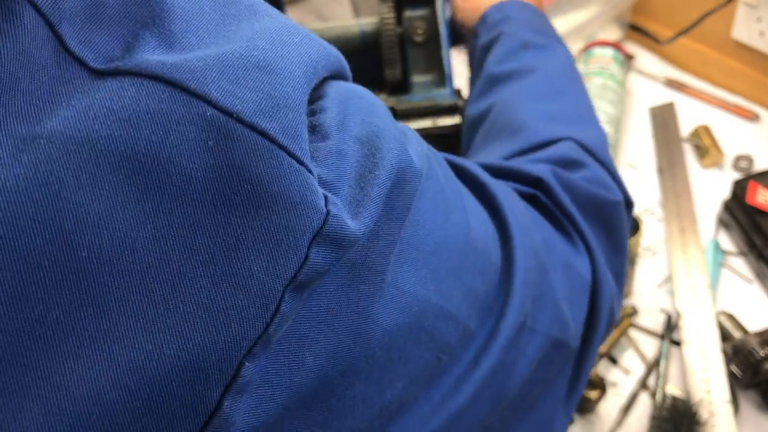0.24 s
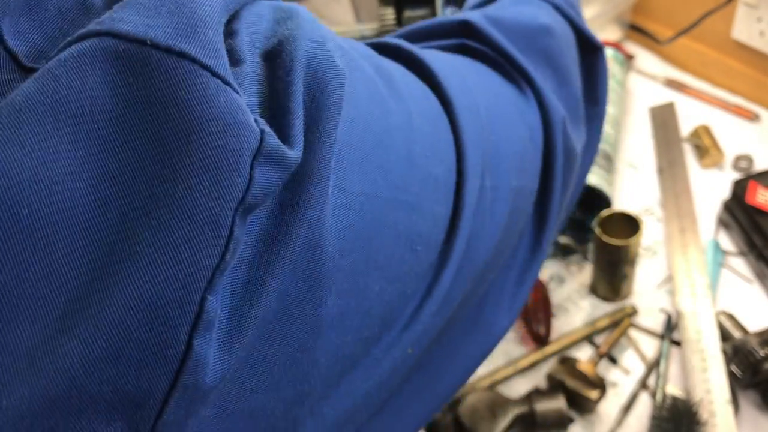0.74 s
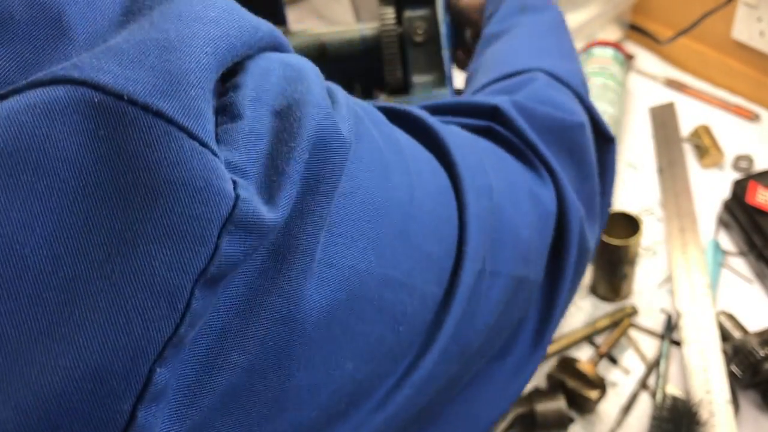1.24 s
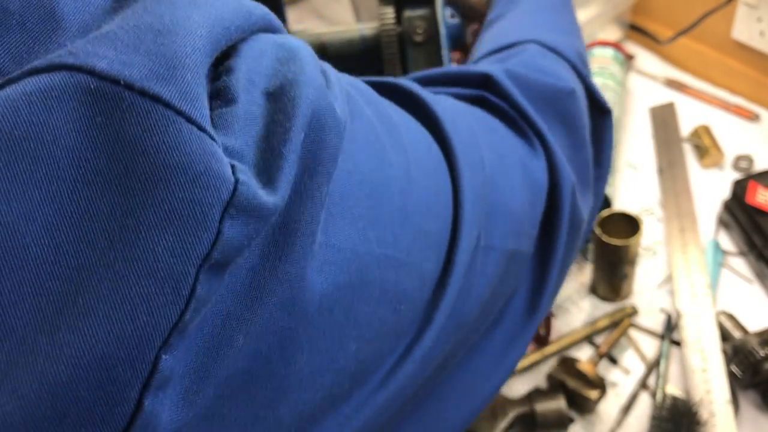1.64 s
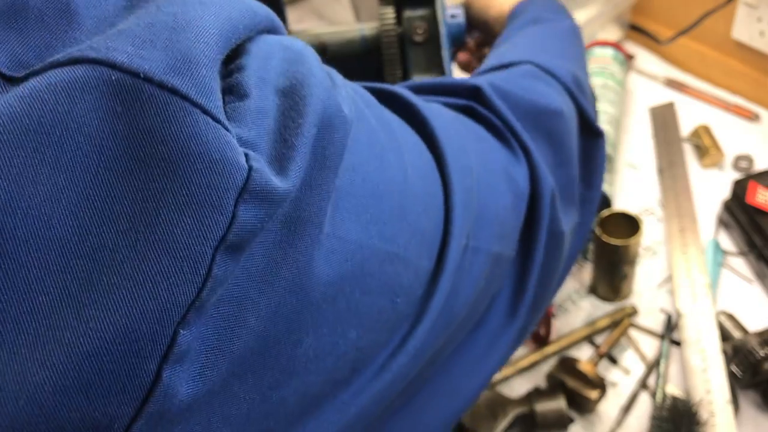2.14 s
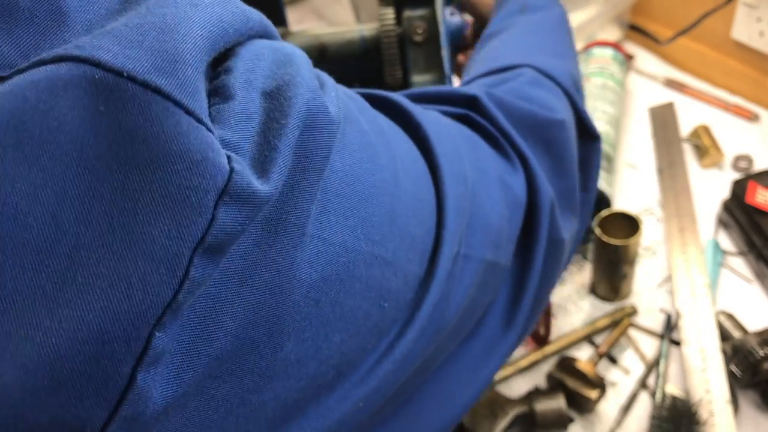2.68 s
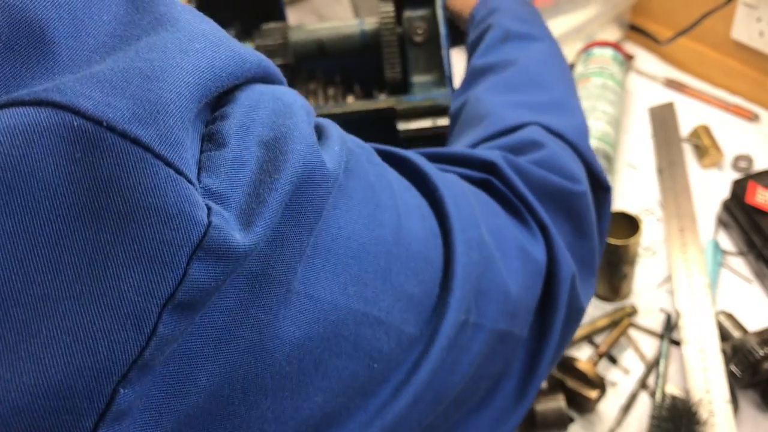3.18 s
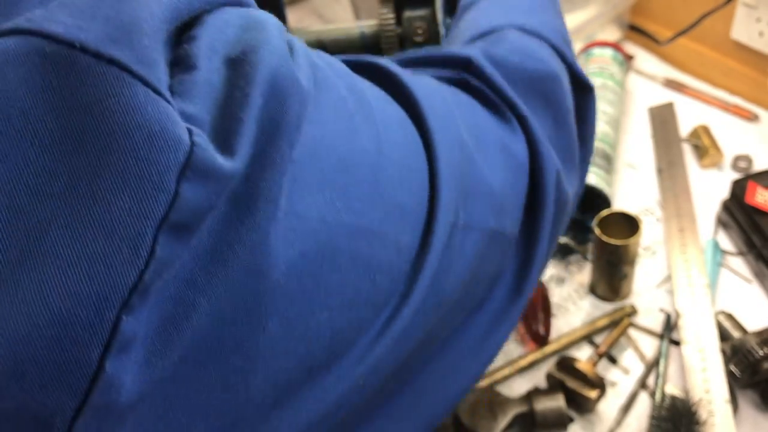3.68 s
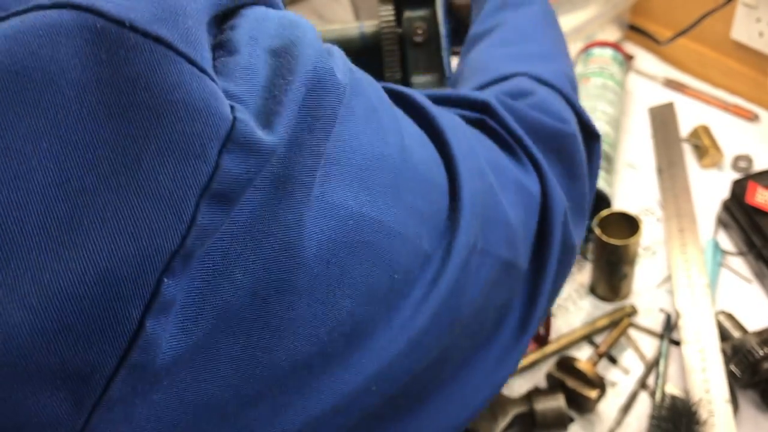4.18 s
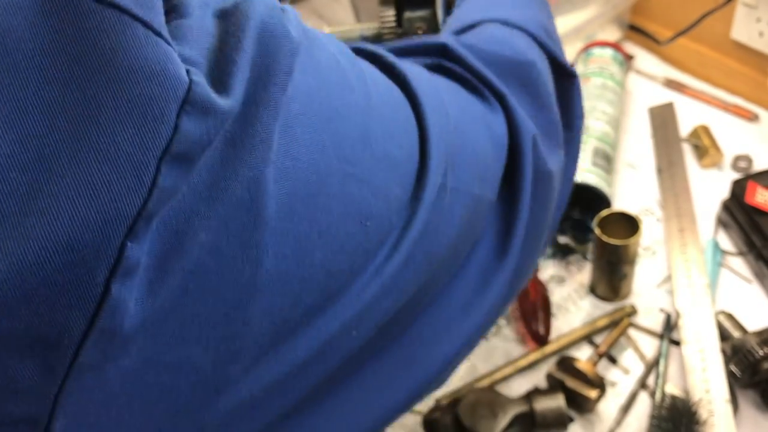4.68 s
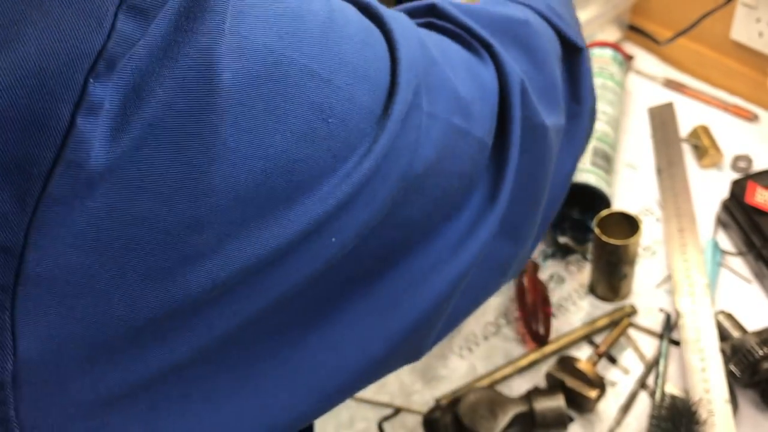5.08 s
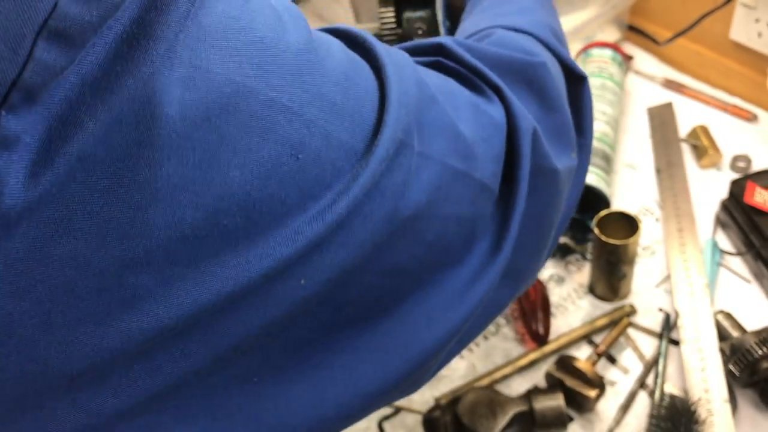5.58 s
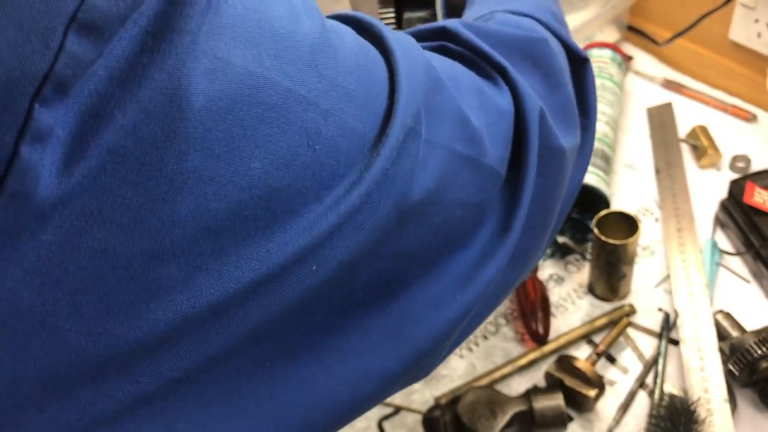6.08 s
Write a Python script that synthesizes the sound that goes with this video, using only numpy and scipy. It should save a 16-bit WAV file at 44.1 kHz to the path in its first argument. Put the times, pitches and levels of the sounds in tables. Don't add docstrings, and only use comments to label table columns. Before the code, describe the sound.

Close to a small microphone, a hand rocks a steel gearbox on a wooden bench. A violent clack with quick rebounds comes first, then spaced single clunks with light ticks. Midway, bright ball snaps lead into heavy jams with bench thuds, short scrapes and a rustling sleeve. Two last clunks follow more quietly. A small hard workshop rings briefly behind, over faint hum and hiss.

```python
import sys
import numpy as np
from scipy import signal
from scipy.fft import rfft, irfft
from scipy.io import wavfile
from scipy.ndimage import uniform_filter1d

SR = 44100
rng = np.random.default_rng(int(sys.argv[2]) if len(sys.argv) > 2 else 0)


def voltage_ratio(level):
    return 10 ** (np.asarray(level, float) / 20)


def master_out(mix):
    frames = np.transpose(np.atleast_2d(mix))
    ceiling = np.clip(frames, -1, 1)
    pcm = np.round(ceiling * 32767).astype(np.int16)
    wavfile.write(sys.argv[1], SR, pcm)


N = 279152
HISS_EDGE_HZ = 15850


def evened(x):
    return x / np.sqrt(np.mean(x ** 2) + 1e-20)


def read(points, hz):
    f, value = np.transpose(points)
    return np.interp(np.log(hz + 1), np.log(f + 1), value)


def add(mix, s, sound):
    part = mix[round(s * SR):][:len(sound)]
    part += sound[:len(part)]


def follow(strokes, fade_s):
    level, t = np.zeros(N), np.arange(N) / SR
    for start, end, start_db, end_db in strokes:
        fade = np.clip(np.minimum(t - start, end - t) / fade_s, 0, 1)
        level += voltage_ratio(np.interp(t, [start, end], [start_db, end_db])) * fade
    return level


def noise(points, patchy_db):
    frames, hz = N // 512 + 5, np.fft.rfftfreq(2048, 1 / SR)
    a, b, patches = rng.standard_normal((frames, 1025, 3)).T
    patches = uniform_filter1d(patches, size=40, axis=0)
    patches = evened(uniform_filter1d(patches, size=6, axis=1))
    gain = voltage_ratio(read(points, hz)[:, None] + patchy_db * patches)
    z = (a + 1j * b) * gain * (hz < HISS_EDGE_HZ)[:, None]
    return evened(signal.istft(z, nperseg=2048, noverlap=1536)[1][:N])


def ring(modes, level_db, stretch, size, phase=0):
    hz, width, db = np.transpose(modes)[:, :, None]
    t = np.arange(size) / SR
    height = voltage_ratio(db + level_db[:, None]) * width
    decay = np.exp(-np.pi * width * t / stretch)
    return (height * decay * np.sin(2 * np.pi * hz * t + phase)).sum(0)


def causal(points, tilt_db):
    hz = abs(np.fft.fftfreq(2048, 1 / SR))
    colour_db = read(points, hz) + tilt_db * np.log2(hz / 2000 + .05)
    log_gain = np.log(voltage_ratio(np.maximum(colour_db, -100)))
    return np.fft.ifft(np.exp(np.conj(signal.hilbert(log_gain)))).real[:1024]


def struck(events, modes, crack, crack_db, stretch, left_db, top_tilt_db, rough, rise_s):
    narrowest_hz = 36
    spot_db = 1.5
    out, t = np.zeros(N), np.arange(6000) / SR
    octaves = np.log2(np.transpose(modes)[0] / 2000)
    phase = 2 * np.pi * rng.random((len(modes), 1))
    luck = rng.standard_normal((30, len(t)))
    modes = np.maximum(modes, [0, narrowest_hz, -99])
    onset = 1 - np.exp(-(t / rise_s) ** 2)
    for (s, db, tilt_db, chatter), spot in zip(events, luck):
        tilt_db = min(tilt_db, top_tilt_db)
        shape = (np.exp(-(t / chatter) ** 3) + voltage_ratio(left_db)) * onset
        rattle = uniform_filter1d(uniform_filter1d(spot[::-1], size=110), size=40)
        shake = 1 + rough * evened(rattle)
        level_db = tilt_db * octaves + spot_db * spot[:len(modes)]
        body = shape * shake * ring(modes, level_db, stretch, len(t), phase)
        grit = signal.fftconvolve(spot * shape * np.exp(-t / 0.02), causal(crack, tilt_db))[:len(t)]
        body = body / np.linalg.norm(body) + voltage_ratio(crack_db) * grit / np.linalg.norm(grit)
        add(out, s + 0.00028, voltage_ratio(db) * body / abs(body).max())
    return out


# (frequency [Hz], density [dB per Hz])
HUM = [(15, -44.5), (25, -18), (37, 9.5), (48, -0.5), (56, -21.5), (69, -28.5), (83, -1.5), (102, -4),
       (124, -15), (205, -6.5), (267, -12), (299, -10.5), (424, -15), (609, -15), (700, -17.5), (910, -43),
       (1540, -120)]
# (frequency [Hz], density [dB per Hz])
HISS = [(410, -52), (700, -5.5), (1010, 1.5), (1120, -3.5), (1220, 2), (1720, -5), (2260, -3.5),
        (2640, -5.5), (3170, -5), (4500, -8), (4930, -8.5), (6920, -9.5), (7670, -10), (12100, -10.5),
        (15700, -14)]


def floor():
    buzz = voltage_ratio(-69.5) * np.sqrt(2) * np.sin(2 * np.pi * 99.4 * np.arange(N) / SR)
    hum = voltage_ratio(-61.5) * noise(HUM + [(1500, -84.5)], patchy_db=-0.5)
    return buzz + hum + voltage_ratio(-64) * noise(HISS[:-1], patchy_db=1.76)


# (frequency [Hz], fall by 60 dB [s])
ROOM_T60 = [(100, 0.11), (500, 0.38), (1500, 0.38), (4000, 0.37), (8000, 0.39), (15500, 0.26)]
# (frequency [Hz], level [dB])
ROOM_COLOUR = [(300, 2.5), (2000, -2.5), (2500, 3.5), (2850, -2.5), (4100, 0), (7600, -4), (8700, 2),
               (10000, -5), (15500, 3)]


def workshop(x, start_s):
    far_wall_s, before_wall_db = 0.025, -2
    out, turn = np.zeros(N), np.arange(N) / SR * 2.3
    shares = np.cos(np.pi * (turn + np.arange(3)[:, None] / 3)) ** 4
    for share in shares / np.linalg.norm(shares, axis=0):
        taps = np.zeros(SR // 2)
        at = np.arange(round(start_s * SR), len(taps) - 16, 16)
        taps[at + rng.integers(0, 16, len(at))] = rng.choice([-1., 1.], len(at))
        taps[:round(far_wall_s * SR)] *= voltage_ratio(before_wall_db)
        hz, t, z = signal.stft(taps, SR, nperseg=256)
        z = z * voltage_ratio(read(ROOM_COLOUR, hz))[:, None]
        z = z * voltage_ratio(-60 * t / read(ROOM_T60, hz)[:, None])
        tail = signal.istft(z, SR, nperseg=256)[1]
        power = abs(rfft(tail)) ** 2 + 1e-12
        even = np.sqrt(uniform_filter1d(power, size=201) / uniform_filter1d(power, size=21))
        tail = irfft(rfft(tail) * even, len(tail))
        i = np.arange(len(tail))
        tail = tail * (i > start_s * SR) * voltage_ratio(-20 * (i / len(tail)) ** 8)
        out += signal.oaconvolve(x * share, tail / np.linalg.norm(tail))[:N]
    return out


# (start [s], end [s], level at start [dB], at end [dB])
SLEEVE = [
    (3.66, 3.745, -66, -63),
    (4.11, 4.25, -63, -63),
    (6.19, 6.33, -72, -72),
]
# (frequency [Hz], density [dB per Hz])
CLOTH = [(1500, -28), (2600, -9), (3450, 0), (4000, -5), (4800, -17), (9000, -19), (15000, -22)]
# (start [s], end [s], level at start [dB], at end [dB])
RUSTLE = [
    (3.33, 4.0, -66.5, -62.5),
    (4.05, 4.7, -67, -67.5),
    (4.7, 5.05, -59.5, -68.5),
    (5.1, 5.22, -67, -65.5),
    (6.19, 6.33, -63, -62),
]
# (frequency [Hz], density [dB per Hz])
JACKET = [(800, -10), (2500, -2), (5000, -4), (8000, -5), (12000, -7.5), (15500, -10)]


def sleeve():
    brushing = follow(SLEEVE, fade_s=.02) * noise(CLOTH, patchy_db=2.5)
    return brushing + follow(RUSTLE, fade_s=0.015) * noise(JACKET, patchy_db=-0.5)


# (time [s], peak level [dB], lower modes against the rest [dB])
THUMPS = [(0.22, -42, 21.5), (.333, -30.5, -3), (.313, -40, -2), (0.362, -17, -4.5), (1.17, -43, 11),
          (1.582, -45.5, -5), (1.62, -42.5, -15), (2.128, -44, -8), (2.576, -47.5, 9), (2.774, -44.5, 7),
          (3.058, -30, 10.5), (3.341, -41.5, 0), (3.391, -34, 20), (3.4429, -17, 11), (3.787, -37.5, -7),
          (3.832, -38, 0), (3.856, -33.5, 8), (3.876, -34, 3), (3.903, -15, -18), (4.255, -28, 18),
          (4.489, -46, 0), (4.511, -40, -4), (4.573, -32.5, -6), (4.6, -23, 17.5), (4.675, -35.5, -4),
          (5.432, -42.5, -10.5), (5.89, -47.5, 0), (5.962, -44, 15)]
# (time [s], level [dB])
DRAG = [(0, -49.5), (.15, -85), (.39, -33), (0.599, -62.5), (1.0, -67.5), (1.6, -72), (3.0, -59),
        (3.44, -56), (3.79, -57), (4.0, -62), (4.27, -50.5), (4.6, -57), (5.04, -73.5), (5.53, -65),
        (5.949, -67), (6.33, -83)]
# (frequency [Hz], width [Hz], level [dB])
BENCH = [(45.3, 2.7, -1), (85.4, 26, -15.5), (96.5, 7.3, -17), (119.6, 45, 5.5), (161, 26, -11.5),
         (211, 26, -11), (283, 110, -11)]
BENCH_SIGN = [
    [1],
    [1],
    [-1],
    [1],
    [-1],
    [-1],
    [1],
]


def bench():
    out, t = np.zeros(N), np.arange(9000) / SR
    lower = abs(np.transpose(BENCH)[0] - 92) < 15
    phase = np.arccos(BENCH_SIGN)
    load = 1 + .04 * rng.standard_normal((40, len(BENCH), 1)) * [1, 0, 0]
    rise = (1 - np.exp(-t / 0.014)) ** 2
    settling = np.exp(-(t / 0.018) ** 4) + voltage_ratio(-13)
    for (s, db, lower_db), shift in zip(THUMPS, load):
        sound = ring(BENCH * shift, lower_db * lower, 1.08, len(t), phase) * rise * settling
        add(out, s - .004, voltage_ratio(db) * sound / abs(sound).max())
    s, db = np.transpose(DRAG)
    murmur = signal.fftconvolve(rng.standard_normal(N), ring(BENCH, 0. * lower, 0.706, len(t), phase))[:N]
    return out + voltage_ratio(np.interp(np.arange(N) / SR, s, db) - 1.0) * evened(murmur)


# (frequency [Hz], width [Hz], level [dB])
FOOT = [(124, 14, -0.5), (170.8, 32, -1), (251.6, 20, -8.5), (314, 36, -12)]


def foot():
    out, t = np.zeros(N), np.arange(6000) / SR
    shape = (1 - np.exp(-t / 0.01)) * (np.exp(-(t / 0.051) ** 3) + voltage_ratio(-16))
    rock = shape * ring(FOOT, np.zeros(len(FOOT)), 0.99, len(t))
    for s, db, *_ in CLUNKS:
        add(out, s + 0.00634, voltage_ratio(db - 15.5) * rock / abs(rock).max())
    return out


# (start [s], length [s], first pitch [Hz], level [dB])
SQUEAK = (6.228, .06, 14990, -57)


def squeak():
    fall_hz_per_s, fade_db_per_s = 22000, 200
    s, length, hz, db = SQUEAK
    t = np.arange(0, length, 1 / SR)
    waver = 1 + 0.4 * evened(uniform_filter1d(rng.standard_normal(N), size=150))[:len(t)]
    tone = np.sqrt(2) * np.sin(2 * np.pi * np.cumsum(hz - fall_hz_per_s * t) / SR)
    out = np.zeros(N)
    add(out, s, voltage_ratio(db - fade_db_per_s * t) * waver * tone * signal.windows.tukey(len(t), .6))
    return out


# (start [s], end [s], level at start [dB], at end [dB])
SCRAPE = [
    (-.02, .08, -46.5, -75),
    (.19, .29, -71, -73),
    (3.1, 3.2, -61, -83),
    (3.22, 3.42, -77, -61),
    (3.76, 3.885, -56, -43.5),
    (4.42, 4.555, -65, -73),
    (5.89, 6.05, -72, -70),
]


def scrape():
    slips = rng.standard_normal(N) * voltage_ratio(2.0 * rng.exponential(1, N))
    slips = slips * (rng.random(N) < 900 / SR)
    grain = ring(SELECTOR, np.zeros(len(SELECTOR)), 0.74, size=1500)
    return voltage_ratio(-6.5) * follow(SCRAPE, fade_s=0.023) * evened(signal.fftconvolve(slips, grain)[:N])


# (frequency [Hz], width [Hz], level [dB])
LATCH = [(1845, 138, 3.5), (2264, 27.4, -4), (2435, 68, -6), (4060, 64, -8.5), (9640, 36, -24.5)]


def latch():
    out, t = np.zeros(N), np.arange(3000) / SR
    shape = (1 - np.exp(-t / 0.0033)) * (np.exp(-(t / 0.025) ** 3) + voltage_ratio(-24))
    octaves = np.log2(np.transpose(LATCH)[0] / 2000)
    loaded = [(s, db, -12) for s, db, *_ in JAMS + STOPS]
    for s, db, tilt_db, *_ in CLUNKS + loaded + SLAMS[:1]:
        ping = shape * ring(LATCH, 0.47 * tilt_db * octaves, 0.97, len(t))
        if db > -27:
            add(out, s + .006, voltage_ratio(db - 7.5) * ping / abs(ping).max())
    return out


# (time [s], peak level [dB], tilt [dB per octave])
TOUCHES = [(.2, -51, 18), (.224, -49, -9), (0.266, -54, -23), (1.172, -48.5, -4), (1.565, -38.5, 4.5),
           (2.071, -38, 0.5), (2.584, -42.5, -4.5), (2.771, -48.5, -13), (3.011, -30, 1),
           (3.042, -31, -3.5), (3.056, -34.5, -11), (3.244, -46, -2.5), (3.339, -47.5, -10),
           (3.745, -28.5, 4), (3.776, -37.5, 4), (3.822, -37.5, -1), (3.841, -40, -18), (1.621, -55, 0),
           (5.893, -60, -16), (3.873, -40, -7), (4.222, -48, -5), (4.402, -30, 4), (5.374, -53.5, -7),
           (5.881, -44.5, -1)]
# (frequency [Hz], width [Hz], level [dB])
SELECTOR = [(870, 46, -4.5), (1022, 40, -5.5), (1254, 41, 0.5), (1480, 55, -7.5), (1814, 28, -2),
            (1894, 57, -4), (2690, 90, -18), (2070, 21, -16.5), (2432, 33, -28), (3193, 100, -23.5)]
# (frequency [Hz], density [dB per Hz])
SELECTOR_CRACK = [(350, -53), (600, -15), (1200, -11), (1560, -14), (1850, -5), (2480, -20.5), (4000, -31),
                  (5200, -55), (8800, -120)]


def selector():
    touches = [(*row, .014) for row in TOUCHES]
    return struck(touches, SELECTOR, SELECTOR_CRACK, crack_db=-6, stretch=2.2, left_db=-11.5,
                  top_tilt_db=3.5, rough=0.15, rise_s=0.0018)


# (time [s], peak level [dB], tilt [dB per octave], chatter [s])
SNAPS = [(.238, -50, -2, .004), (.326, -46, -5, 0.0045), (.4413, -27, -7, 0.023), (1.1233, -45, 13.5, .011),
         (1.4066, -48.5, 0, .02), (2.705, -38.5, 7, .009), (2.832, -49, 3, 0.012), (3.0101, -19, -1, 0.009),
         (3.4333, -32.5, -6.5, 0.012), (3.744, -20, -1, 0.0085), (3.899, -30, -17.5, 0.012),
         (4.3997, -20, -1, 0.01), (4.699, -28.5, -3.5, 0.014), (5.021, -38, 10, 0.0053),
         (6.032, -53, 7.5, 0.0072), (6.0848, -49, 9, .009)]
# (frequency [Hz], width [Hz], level [dB])
BALL = [(2700, 45, -8), (3840, 44, -17.5), (4460, 83, -5.5), (5744, 45, -1.5), (6440, 37, -3.5),
        (7050, 38, -1.5), (8100, 37, 1), (8600, 17, -8), (9070, 66, -0.5), (8814, 120, -2.5),
        (9330, 90, -0.5), (10650, 54, -5), (11280, 100, -0.5), (12470, 100, 2), (12650, 150, -4),
        (12400, 70, -13.5), (13230, 80, -2), (14300, 70, -5.5), (15400, 60, 0), (15400, 80, -5)]
# (frequency [Hz], density [dB per Hz])
BALL_CRACK = [(1180, -24), (2000, -21.5), (3230, -13), (9090, -3.5), (11000, -4.5), (14800, -7.5),
              (15900, -3), (16600, -3)]


def ball():
    return struck(SNAPS, BALL, BALL_CRACK, crack_db=7.5, stretch=1.6, left_db=-9.0,
                  top_tilt_db=14, rough=0.29, rise_s=0.00078)


# (time [s], peak level [dB], tilt [dB per octave], chatter [s])
STOPS = [(.296, -43.5, -3, 0.0073), (0.304, -39.5, 1, 0.016), (0.346, -41, -3, 0.0074),
         (0.326, -39.5, 1.5, 0.037), (3.048, -28, -2.5, 0.012), (3.395, -43.5, -4, 0.016),
         (4.246, -27.5, -2, 0.0063), (4.562, -39, 4, 0.0054), (4.676, -28, 0.5, 0.012),
         (5.431, -49, -10, 0.0084), (5.962, -48.5, -5, 0.014), (6.323, -32.5, -16, 0.0038)]
# (frequency [Hz], width [Hz], level [dB])
CASE = [(427, 133, -2), (597, 37, -3.5), (680, 54, -15.5), (785, 20, 2.5), (992, 92, 12.5), (1170, 30, -1),
        (1450, 53, 0), (1846, 31, -1), (2047, 42, -16.5), (2348, 78, -12.5), (2750, 87, -6),
        (3300, 89, -27), (4060, 98, -27), (5680, 123, -24.5), (6600, 100, -31)]
# (frequency [Hz], density [dB per Hz])
CASE_CRACK = [(240, -40.5), (400, -2), (673, -9.5), (886, -8.5), (1380, -4), (1650, -8), (1850, -10),
              (3060, -20), (15500, -50)]


def case():
    return struck(STOPS, CASE, CASE_CRACK, crack_db=-4.0, stretch=0.4, left_db=5.0,
                  top_tilt_db=1.5, rough=0.79, rise_s=0.004)


# (time [s], peak level [dB], tilt [dB per octave], chatter [s])
JAMS = [
    (3.434, -16.5, -3.5, 0.013),
    (3.8954, -16, -3, 0.012),
    (4.596, -16.5, 0.5, 0.016),
]
# (frequency [Hz], width [Hz], level [dB])
LOADED = [(393, 74, -9), (544, 65, -5), (717, 140, -6), (890, 54, -3.5), (914, 51, 2), (1055, 30, 2.5),
          (1303, 23, -10.5), (1439, 24, 3.5), (1780, 100, -6), (2090, 59, -4), (2210, 32, -6),
          (2780, 55, -7), (3300, 71, -12), (3730, 45, -15), (4130, 110, -17), (4290, 83, -15),
          (5500, 90, -19)]


def jammed():
    return struck(JAMS, LOADED, CASE_CRACK, crack_db=-3.0, stretch=1.0, left_db=-7,
                  top_tilt_db=2, rough=0.51, rise_s=0.001)


# (time [s], peak level [dB], tilt [dB per octave], chatter [s])
CLUNKS = [
    (1.135, -40, 0.5, 0.0043),
    (1.34, -23.5, 0.5, 0.013),
    (1.7847, -20, 1, 0.01),
    (2.323, -21, 1.5, 0.011),
    (5.634, -20.5, -0.5, 0.0041),
    (6.194, -23, -2, 0.0064),
]
# (frequency [Hz], width [Hz], level [dB])
GEARS = [(438, 60, -2.5), (620, 33, -3.5), (919, 32, 4.5), (1001, 95, 3.5), (1350, 30, -34),
         (1417, 74, 5.5), (1610, 15, -11), (1858, 170, -18), (2285, 30, 4.5), (2426, 28, 2.5),
         (2600, 40, -1), (2750, 67, -14), (2380, 23, -8), (2850, 41, -11.5), (3190, 32, -13.5),
         (3780, 33, -25), (3900, 100, -12.5), (4530, 37, -17.5), (4520, 36, -14), (4790, 29, -11),
         (5700, 36, -33), (6330, 30, -13), (7190, 68, -19), (8700, 75, -38), (9500, 47, -22)]
# (frequency [Hz], density [dB per Hz])
GEAR_CRACK = [(240, -61.5), (400, 1.5), (683, -20.5), (928, -4), (1880, -5), (2670, -7.5), (3200, -21),
              (5730, -20), (9700, -32), (15500, -59)]


def gears():
    return struck(CLUNKS, GEARS, GEAR_CRACK, crack_db=-6.0, stretch=1.0, left_db=-7,
                  top_tilt_db=2, rough=.35, rise_s=0.00018)


# (time [s], peak level [dB], tilt [dB per octave], chatter [s])
SLAMS = [
    (.357, -5, -0.5, 0.0087),
    (.375, -15, 0.5, 0.014),
    (.433, -17, 0, 0.016),
    (.3655, -16, 5, 0.01),
    (.4425, -25.5, 4, 0.0059),
]
# (frequency [Hz], width [Hz], level [dB])
FRAME = [(440, 30, 1.5), (838, 20, 5.5), (975, 42, -3), (1197, 30, -1), (1445, 26, 11), (1650, 20, -31.5),
         (1922, 33, 0), (2080, 26, 6.5), (601, 69, -5), (1022, 40, 0.5), (2367, 30, -3.5),
         (2320, 49.3, -1.5), (2670, 25, -5.5), (2860, 60, -2.5), (3120, 86, -10.5), (3760, 50, -14),
         (4130, 38, -4), (4380, 30, -7), (4800, 84, -24.5), (5100, 23, -17), (5900, 90, -23.5),
         (6360, 22, -20.5), (6650, 32.5, -28.5), (7310, 30, -33), (8790, 60, -35), (9490, 65, -25.5)]
# (frequency [Hz], density [dB per Hz])
FRAME_CRACK = [(240, -52), (400, -2.5), (643, -5), (914, -0.5), (1420, -2.5), (2550, -4.5), (3000, -13),
               (3500, -21.5), (4100, -12.5), (5310, -23.5), (6280, -22.5), (7670, -32), (15500, -53.5)]


def frame():
    return struck(SLAMS, FRAME, FRAME_CRACK, crack_db=4.0, stretch=0.95, left_db=-7.5,
                  top_tilt_db=2, rough=0.54, rise_s=0.00069)


def scene():
    slams = frame()
    clunks = gears() + latch()
    stops = case()
    ticks = selector()
    snaps = ball()
    stops = stops + jammed()
    top = bench() + foot()
    wet = voltage_ratio(-11.5) * slams + voltage_ratio(-9.5) * clunks + voltage_ratio(-8.0) * stops
    wet = wet + voltage_ratio(-9.0) * ticks + voltage_ratio(-12.0) * snaps + voltage_ratio(-3.0) * top
    close = slams + clunks + stops + ticks + snaps + top + scrape() + squeak() + sleeve()
    return (close + workshop(wet, start_s=0.0081) + floor())[None]


# (centre [Hz], width [Hz], level [dB])
MIC_DIPS = [(4910, 260, -2.5), (7770, 270, -3.5), (10430, 400, -3.5), (13650, 300, -0.5), (9000, 700, -0.5)]


def housing(x):
    hz = np.fft.rfftfreq(512, 1 / SR)
    colour_db = sum(db * np.exp(-((hz - centre_hz) / width) ** 2) for centre_hz, width, db in MIC_DIPS)
    return signal.oaconvolve(x, np.fft.fftshift(irfft(voltage_ratio(colour_db)))[None, 1:], "same")


def roll_off(x):
    return signal.sosfilt(signal.butter(12, 16840, fs=SR, output="sos"), x)


def record(dry):
    no_bass = signal.butter(3, 35, "high", fs=SR, output="sos")
    thin = signal.sosfilt(no_bass, housing(dry))
    edge = signal.firwin(801, 16550, window=("kaiser", 10), fs=SR)
    step = signal.firwin(801, HISS_EDGE_HZ, window=("kaiser", 10), fs=SR)
    below = signal.oaconvolve(thin, step[None], "same")
    above = thin - below
    strength = np.sqrt(abs(uniform_filter1d(above ** 2, size=130, axis=1))) / voltage_ratio(-39)
    shelved = below + voltage_ratio(-8) * above * np.minimum(strength, 1) ** 2
    mix = signal.oaconvolve(shelved, edge[None], "same")
    return roll_off(mix)


dry = scene()
out = record(dry)
master_out(out)
```